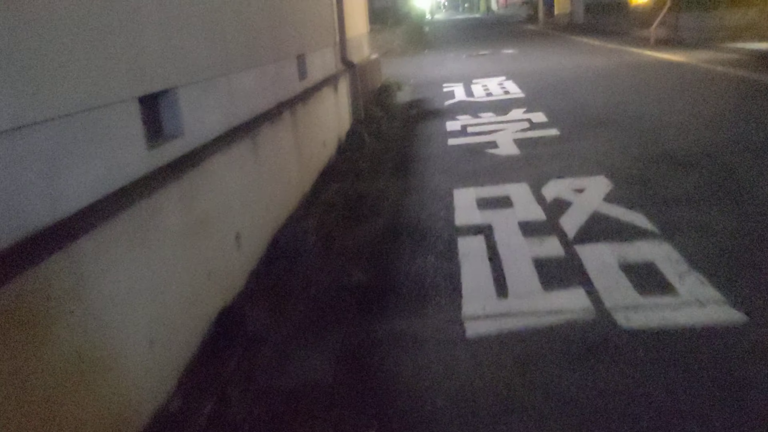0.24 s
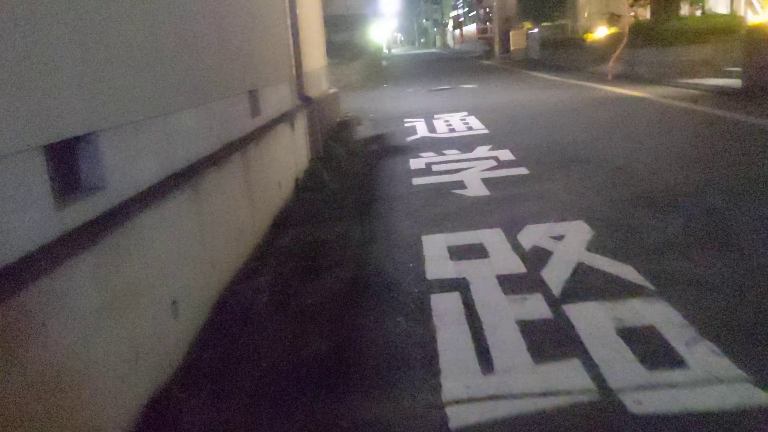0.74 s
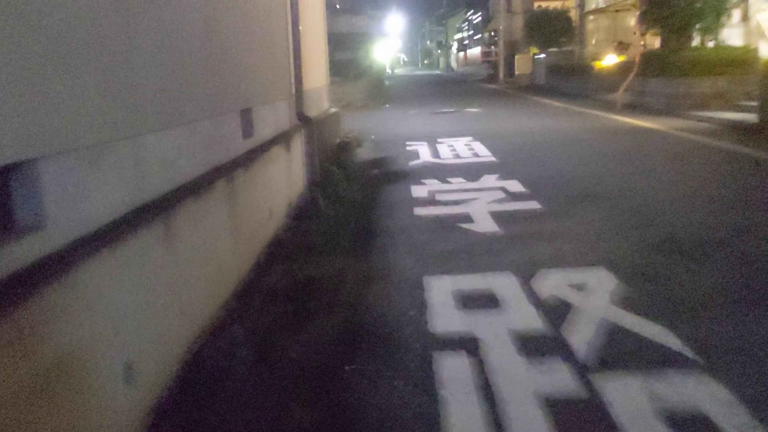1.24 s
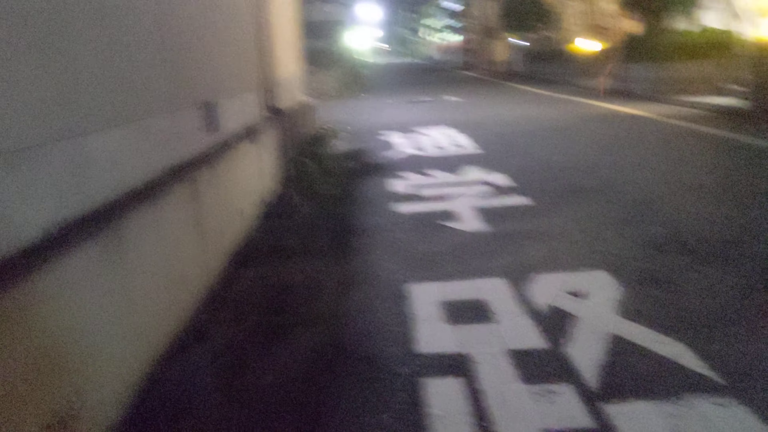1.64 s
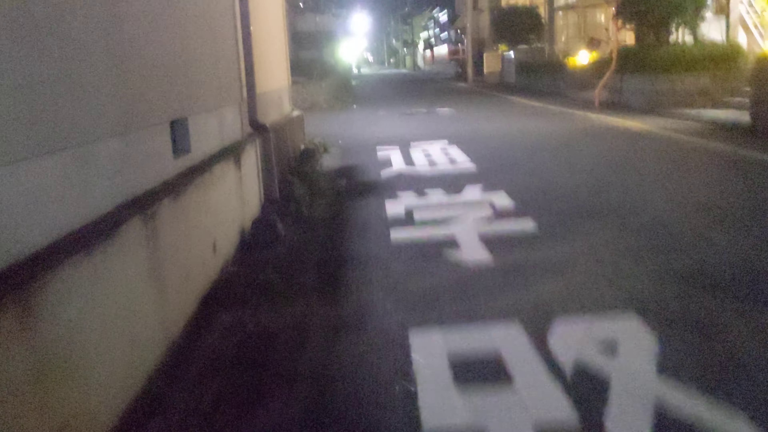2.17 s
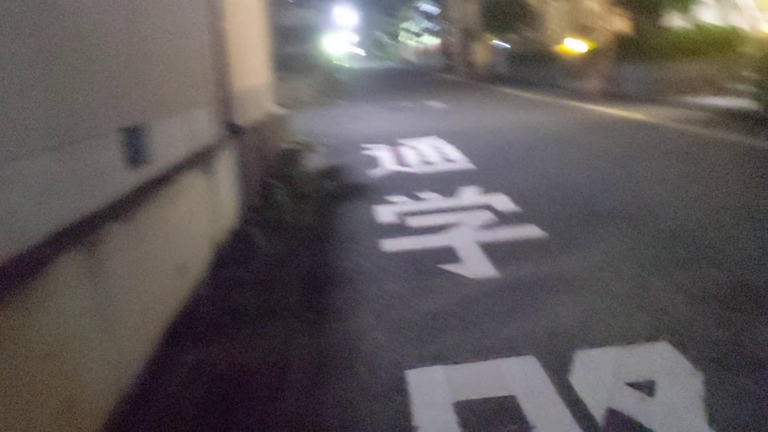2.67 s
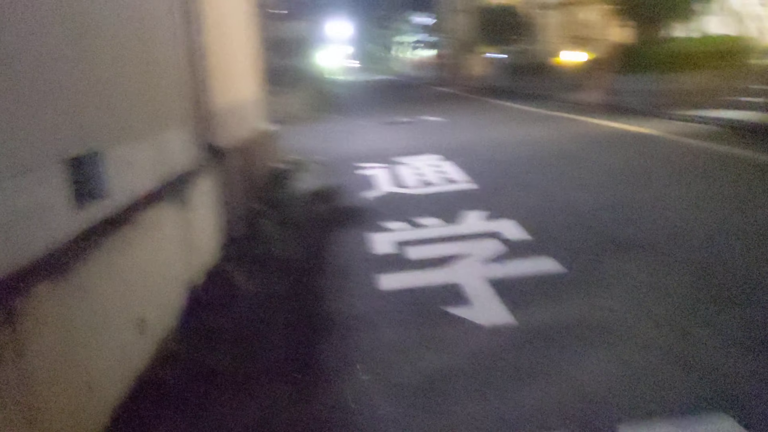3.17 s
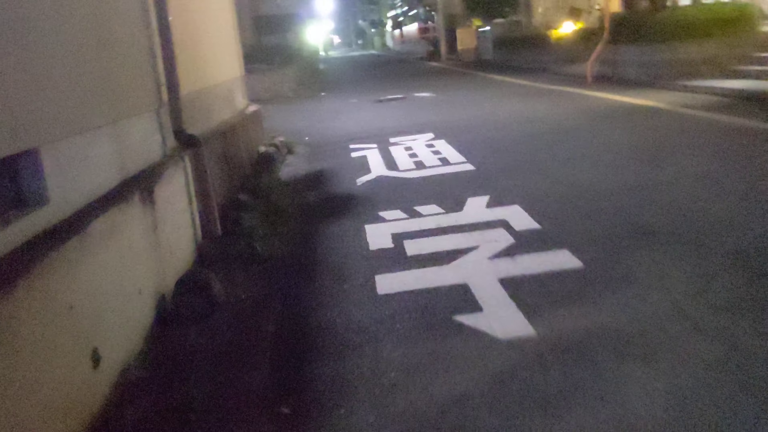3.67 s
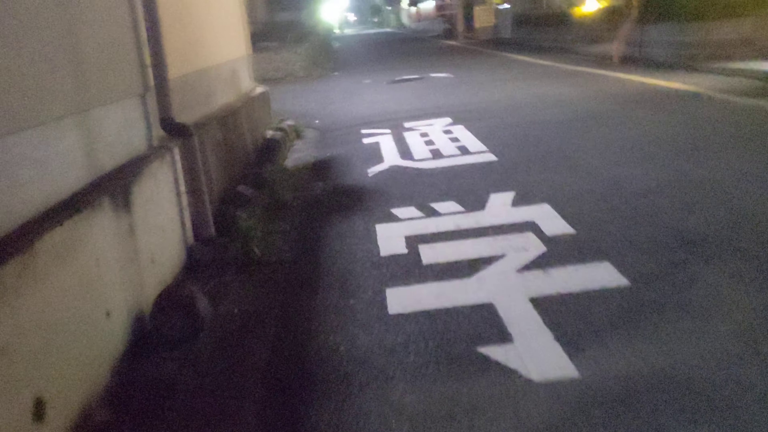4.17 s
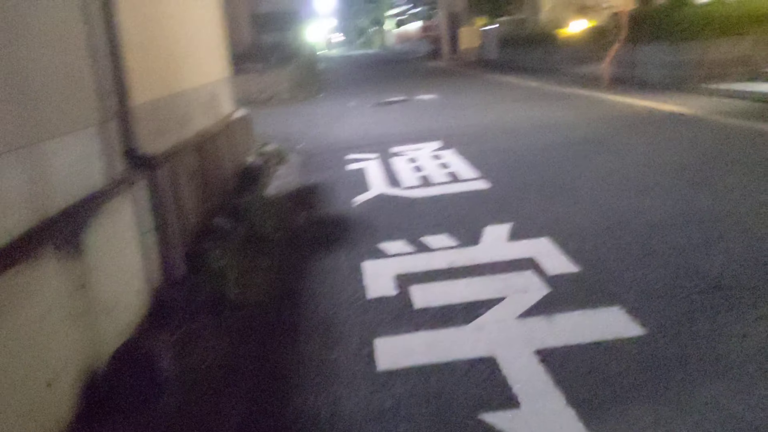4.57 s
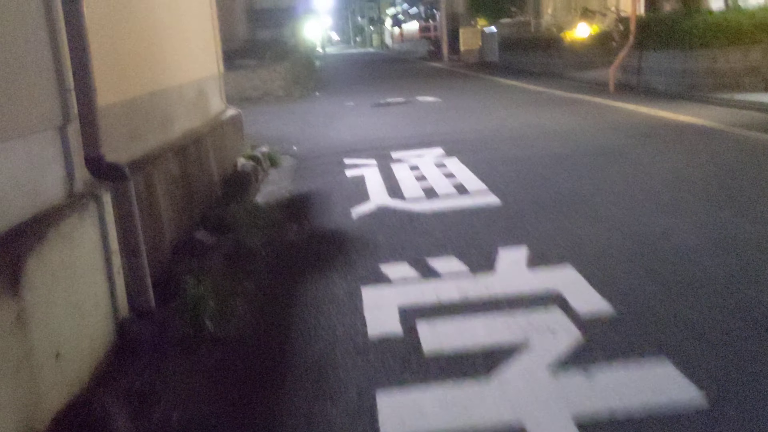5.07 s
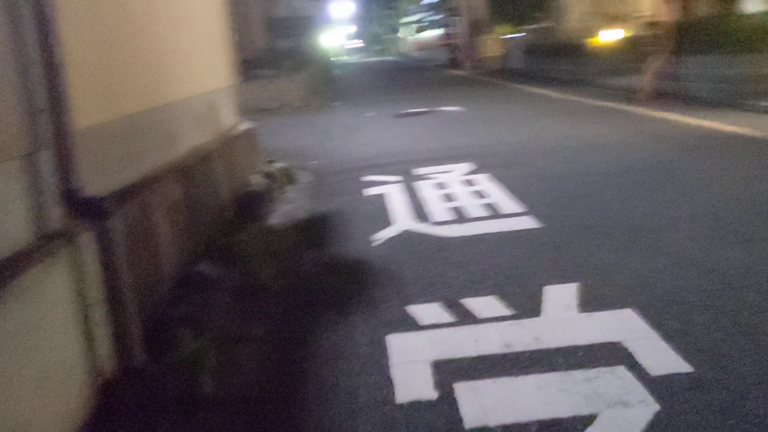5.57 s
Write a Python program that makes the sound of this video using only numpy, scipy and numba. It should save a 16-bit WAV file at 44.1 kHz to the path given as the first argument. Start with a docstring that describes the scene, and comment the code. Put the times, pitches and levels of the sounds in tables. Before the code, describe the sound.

Twelve even footsteps crunch on gritty asphalt at night, heel knocks and rolling scuffs close by, over faint town hiss and low hum.

```python
"""Asphalt street at night: someone walks along it holding a small stereo recorder.
Each step is a heel knock of filtered contact noise, then random grains crunching and slipping under the
rolling sole. The grip thumps the case as short rocking pulses, noise puffs tick faintly in the treble,
and narrow-noise hum lies under the band-filtered hiss of the town."""
import sys
import numpy as np
from scipy import signal
from scipy.io import wavfile
from numba import njit

SR = 44100
rng = np.random.default_rng(int(sys.argv[2]) if len(sys.argv) > 2 else 0)


def store_wav(level_fs):
    """Save 16-bit WAV to argv[1]."""
    pcm = np.round(np.clip(np.atleast_2d(level_fs), -1, 1) * 32767)
    wavfile.write(sys.argv[1], SR, pcm.T.astype(np.int16))


N = 256220

# Heels landing. Each row: start in seconds, level in dB, sole ring in Hz, low knock, mid and treble
# in dB re that level, body thud in dB on its own, time to peak load in seconds.
HEELS = [(0.075, -14, 1370, -40, -21, -18, -34.5, 0.0028), (0.66, -9.5, 1750, -1.5, -5, -18.5, -41, 0.0032),
         (1.057, -20, 1530, -1.5, -7.5, -14, -39, 0.0032), (1.668, -15.5, 650, 0.5, -5.5, -19, -33, 0.0029),
         (2.052, -20, 1340, -9.5, -10, -9, -37.5, 0.0028), (2.646, -11, 995, -1, -15, -22, -32.5, 0.0025),
         (3.063, -12, 1310, -5, -10, -16, -31, 0.0033), (3.593, -10, 565, 1, -23, -20, -33, 0.0025),
         (3.975, -17.5, 1160, -3, -11.5, -14, -30, 0.0052), (4.55, -8.5, 990, -4, -8.5, -20, -40, 0.004),
         (4.981, -19.5, 1070, -4, -8, -19, -34, 0.0021), (5.553, -19, 955, 4, -4, -20, -30, 0.0027)]


def from_db(db):
    """Gain of a level in dB."""
    return 10 ** (np.asarray(db) / 20)


def rms_one(x):
    """Scaled to rms 1."""
    return x / np.sqrt(np.mean(x ** 2) + 1e-20)


def peak_one(x):
    """Scaled so that the first row peaks at 1."""
    return x / np.max(np.abs(x[0]))


def at_hz(points, hz):
    """Value of a (Hz, value) table, linear on a log-frequency axis."""
    points_hz, values = np.array(points).T
    return np.interp(np.log(hz), np.log(points_hz), values)


def drift(rate_hz):
    """Slow random signal of rms 1: noise through two equal poles, drawn at every 20th sample."""
    r = np.exp(-40 * np.pi * rate_hz / SR)
    noise = rng.standard_normal(N // 20 + 2002)
    slow = signal.lfilter([1], [1, -2 * r, r * r], noise)[2000:]   # settled part
    return np.interp(np.arange(N) / 20, np.arange(len(slow)), rms_one(slow))


def resonate(x, hz, width_hz):
    """One two-pole resonance, gain 1 on top."""
    r = np.exp(-np.pi * width_hz / SR)
    zeros = [(1 - r * r) / 2, 0, (r * r - 1) / 2]
    poles = [1, -2 * r * np.cos(2 * np.pi * hz / SR), r * r]
    return signal.lfilter(zeros, poles, x)


def resonate_twice(x, hz, width_hz):
    """The same resonance two times over, for steep skirts."""
    return resonate(resonate(x, hz, width_hz), hz, width_hz)


@njit
def moving_resonance(x, cosine, r):
    """A two-pole resonance whose centre changes sample by sample."""
    y = np.zeros_like(x)
    for c in range(x.shape[0]):
        for i in range(2, x.shape[1]):
            drive = (1 - r * r) / 2 * (x[c, i] - x[c, i - 2])
            y[c, i] = drive + 2 * r * cosine[i] * y[c, i - 1] - r * r * y[c, i - 2]
    return y


def spread(mid, side, alike, pan_db=0):
    """Left and right from a shared and an opposed part; alike is their likeness, -1 to 1."""
    alike = np.clip(alike, -1, 1)
    pair = np.sqrt(1 + alike) * mid + np.sqrt(1 - alike) * side * [[1], [-1]]
    return pair * from_db(np.multiply.outer([.5, -.5], np.atleast_1d(pan_db)))


def bands():
    """Half-octave filters with their centres in Hz."""
    edges_hz = 28 * 2 ** np.arange(0, 9.6, .5)
    return [(np.sqrt(a * b), signal.butter(2, [a, b], "band", fs=SR, output="sos"))
            for a, b in zip(edges_hz, edges_hz[1:])]


def burst(t60_s, rise_s):
    """Two noises under a quick rise and an exponential decay, cut at 1/8 s."""
    t = np.arange(SR // 8) / SR
    envelope = (1 - np.exp(-(t / rise_s) ** 2)) * from_db(-60 * t / t60_s)
    return rng.standard_normal((2, len(t))) * envelope


def add(out, start_s, sound):
    """Mix a short sound in at a time."""
    i = round(start_s * SR)
    out[:, i:i + sound.shape[1]] += sound[:, :N - i]


def town():
    """Distant hiss: noise in half-octave bands with slow level patches; the hum is narrow noise."""
    # Hiss spectrum. Each row: Hz, relative level in dB per Hz.
    hiss_colour = [(15, -35), (25, 2), (59, 3.5), (127, 3), (439, -14), (1290, -19.5), (1560, -17.5),
                   (2760, -25), (3430, -22.5), (7110, -32), (10700, -30), (14400, -44), (16000, -42)]
    # Stereo of the hiss. Each row: Hz, left-right likeness.
    likeness = [(60, -0.14), (180, 0.38), (550, 0.62), (1650, 0.073), (4970, -0.053), (15000, 0.13)]
    # Wavering low hum. Each row: Hz, width of each resonance pass in Hz, level in dB.
    hums = [(55.6, 17, -61.5), (119.6, 12, -69.5)]
    hiss_db, patch_db, patch_rate_hz = -54.5, 3.0, 4.9
    white, hiss = rng.standard_normal((2, 2, N)), 0
    for k, (hz, sos) in enumerate(bands()):
        gain = from_db(at_hz(hiss_colour, hz) + patch_db * drift(patch_rate_hz))
        band = signal.sosfilt(sos, white[k % 2])   # neighbouring bands use separate noises
        hiss = hiss + gain * spread(*band, at_hz(likeness, hz))
    out = from_db(hiss_db) * rms_one(hiss)
    for hz, width_hz, level_db in hums:
        narrow = resonate_twice(rng.standard_normal((2, N)), hz, width_hz)
        out = out + from_db(level_db) * spread(*rms_one(narrow), 0.94)
    return out


def ticks():
    """Treble ticks are short noise puffs through resonances; a small metal part rings as a decaying sine."""
    # Faint ticks. Each row: start in seconds, level in dB.
    puffs = [(0.307, -42.5), (0.355, -43.5), (0.4086, -45), (0.52, -47), (0.9, -47), (1.0253, -45.5),
             (1.3612, -42), (1.465, -45), (1.5824, -42), (1.766, -42), (1.828, -43), (1.944, -47),
             (2.2693, -42.5), (2.288, -47), (2.368, -43), (2.471, -44), (2.588, -42), (2.9364, -46),
             (3.045, -47), (3.2525, -44.5), (3.3555, -42.5), (3.4608, -43.5), (3.6925, -48), (3.91, -41.5),
             (4.2364, -44.5), (4.3436, -42), (4.463, -31), (4.72, -47), (4.842, -43), (4.9566, -43.5),
             (5.27, -44), (5.372, -44.5), (5.4853, -43.5), (5.723, -44)]
    # Resonances of a tick. Each row: Hz, width in Hz, level in dB.
    modes = [(2560, 790, 1.5), (7050, 4400, 1.5), (9600, 500, -16), (14000, 12000, -15.5)]
    # Metal pings. Each row: start in seconds, level in dB, Hz, t60 in seconds.
    pings = [(3.776, -50, 5930, 0.16), (5.748, -63, 5900, 0.14)]
    out = np.zeros((2, N))
    for start_s, level_db in puffs:
        puff = burst(t60_s=0.046, rise_s=0.00045)
        tick = sum(from_db(db) * resonate(puff, hz, width_hz) for hz, width_hz, db in modes)
        add(out, start_s, from_db(level_db) * peak_one(tick))
    t = np.arange(SR // 4) / SR
    for start_s, level_db, hz, t60_s in pings:
        envelope = from_db(level_db - 60 * t / t60_s) * np.minimum(t / 0.0027, 1)
        add(out, start_s, envelope * np.sin(2 * np.pi * hz * t) * [[1], [1]])
    return out


def thumps():
    """The hand shifts on the case: a push rocks it for a cycle or two, the rubbing grip leaves a rumble."""
    # Pushes, opposed at the two ports. Each row: centre in seconds, level in dB, rocking in Hz,
    # envelope spread in seconds, left-right balance in dB.
    pushes = [(0.382, -40, 80, 0.0074, 0), (0.508, -46, 50, 0.013, 1), (0.868, -28, 183, 0.0044, -2.5),
              (0.879, -23.5, 108, 0.0088, -4.5), (0.973, -31, 85, 0.01, 5.5),
              (1.331, -26.5, 90, 0.0089, -7.5), (1.38, -34, 69.6, 0.0062, -1),
              (1.856, -24.5, 81, 0.0057, 5), (2.101, -29, 80, 0.0037, -3), (2.671, -35, 109, 0.01, 19),
              (2.686, -24.5, 110, 0.0054, 7.5), (2.779, -22, 61.8, 0.0054, 7), (3.11, -33, 81, 0.01, -2),
              (3.355, -36, 80, 0.0096, 1), (3.755, -22, 62.5, 0.013, -3)]
    rumble_db, rumble_hz, rumble_width_hz = -16, 90, 94   # level re push
    out, t = np.zeros((2, N)), np.arange(-SR // 20, SR // 10) / SR
    for centre_s, level_db, hz, spread_s, pan_db in pushes:
        before, after = np.exp(-(1.34 * t / spread_s) ** 2), 1 / np.cosh(2.1 * t / spread_s)
        rock = -np.where(t < 0, before, after) * np.cos(2 * np.pi * hz * t)
        add(out, centre_s + t[0], from_db(level_db) * spread(rock, rock, -1, pan_db) / np.sqrt(2))
        rubbing = burst(t60_s=0.26, rise_s=0.0054)
        rumble = peak_one(resonate_twice(rubbing, rumble_hz, rumble_width_hz))
        add(out, centre_s, from_db(level_db + rumble_db) * spread(*rumble, -0.15, pan_db))
    return out


def last_heel():
    """Index of the latest heel at every sample; the first heel's before it lands."""
    return np.maximum(np.searchsorted(np.array(HEELS)[:, 0], np.arange(N) / SR) - 1, 0)


def blows():
    """Heels and cracks as one list; all cracks share their low, treble, thud and contact settings."""
    # Single stones cracking under the sole. Each row: start in seconds, level in dB, ring in Hz,
    # mid in dB re level.
    cracks = [(0.092, -29, 820, -19), (0.122, -29.5, 1350, -23), (0.141, -25, 800, -27),
              (0.165, -21.5, 1220, -27), (0.196, -33, 828, -21), (0.225, -36, 784, -30),
              (0.454, -42.5, 1020, -5), (0.684, -15.5, 961, -0.5), (0.698, -17, 1020, 4.5),
              (0.705, -18, 830, 2.5), (0.778, -38, 497, -7), (1.085, -16.5, 900, -18),
              (1.113, -40, 563, -10), (1.148, -31, 1380, -8), (1.18, -33, 856, -16), (1.215, -37, 930, -9),
              (1.278, -38.5, 880, -2), (1.362, -45.5, 1000, -2), (1.452, -45, 1200, -6),
              (1.687, -19, 1140, -11), (1.713, -12, 910, -1), (2.094, -25, 888, -2.5),
              (2.115, -26, 1390, -10), (2.147, -25.5, 960, -16), (2.205, -40, 826, -13),
              (2.352, -43.5, 1230, 4), (2.665, -31, 1310, 8), (2.773, -28.5, 670, -14),
              (2.8, -43, 900, -1.5), (2.861, -36, 970, -8.5), (3.111, -21.5, 570, -14),
              (3.196, -19.5, 890, -9), (3.32, -31, 1150, -0.5), (3.385, -46, 1200, -6),
              (3.442, -45, 1200, -11), (3.768, -39, 900, -5), (3.406, -37, 960, -20),
              (3.476, -36, 1280, -3.5), (3.802, -43, 1380, -2), (4.01, -36, 581, -14),
              (4.049, -27.5, 894, -7), (4.086, -25.5, 1140, -3), (4.11, -34.5, 870, 3.5),
              (4.127, -31, 990, -2), (4.382, -44, 1010, 1.5), (4.447, -33, 950, -14),
              (4.493, -38, 1010, -17), (4.572, -16.5, 1360, -3.5), (4.632, -23, 970, 1),
              (4.78, -37.5, 820, -7.5), (4.995, -23.5, 1200, -27), (5.019, -24, 845, -11),
              (5.033, -26, 1170, -24), (5.051, -26.5, 1120, -21), (5.125, -38, 1070, -1),
              (5.245, -40.5, 714, -9), (5.336, -43.5, 1250, -7), (5.593, -20, 1260, 3.5)]
    low_db, treble_re_mid_db, thud_re_level_db, press_s = -12.5, -8, -25.5, 0.0029
    return HEELS + [(start_s, level_db, hz, low_db, mid_db, mid_db + treble_re_mid_db,
                     level_db + thud_re_level_db, press_s)
                    for start_s, level_db, hz, mid_db in cracks]


def sole_load():
    """Level, ring pitch, mid and treble of the grit in time; the loudest contact rules."""
    # Faint rustle after each heel, one row per heel. Each row: level in dB, fade in dB/s.
    linger = [(-33, 49), (-30, 60), (-33.5, 51), (-28, 64.5), (-29, 54), (-32, 66), (-33.5, 35), (-31, 65),
              (-30, 56.5), (-31, 65), (-34, 55), (-34, 53)]
    # Sole rolling or scuffing over grit. Each row: touch, rise and hold in seconds, level at touch,
    # full and lift in dB, sole ring in Hz, mid and treble in dB.
    rolls = [(0.0, 0.004, 0.062, -36, -38, -46.5, 1250, -7, 20.5),
             (0.093, 0.073, 0.097, -29, -29.5, -33.5, 950, -9, -1.5),
             (0.667, 0.023, 0.031, -15, -9.5, -14.5, 824, -1, 3.5),
             (1.074, 0.011, 0.036, -14.5, -13.5, -28.5, 865, -4, -4),
             (1.169, 0.048, 0.046, -37.5, -29, -39, 890, -1.5, -2),
             (1.687, 0.039, 0.012, -19, -6, -15.5, 920, -2.5, -3.5),
             (2.052, 0.038, 0.028, -28, -30, -24, 950, 3.5, 1),
             (2.142, 0.04, 0.075, -27.5, -29, -36.5, 830, -3.5, -2),
             (2.662, 0.007, 0.053, -29, -28.5, -30.5, 1030, 1.5, 15.5),
             (3.057, 0.055, 0.094, -28.5, -22.5, -20, 615, 1.5, -3),
             (3.608, 0.025, 0.026, -23, -15.5, -25, 1090, -8, 5.5),
             (3.99, 0.0075, 0.019, -27, -22, -27.5, 640, -7, 0.5),
             (4.033, 0.07, 0.031, -24, -19.5, -28, 885, -6.5, -3),
             (4.454, 0.016, 0.048, -31, -35.5, -43, 900, -1.5, 0.5),
             (4.552, 0.015, 0.08, -19, -13.5, -28.5, 940, -5.5, 1),
             (4.998, 0.005, 0.038, -24, -30.5, -30, 1050, -3.5, 0.5),
             (5.045, 0.0057, 0.091, -30, -25, -26.5, 880, -10, -3.5),
             (5.568, 0.039, 0.017, -17.5, -13, -22, 1056, -4.5, 3)]
    stride_s, lift_db_per_s = 0.5, 944   # the grit falls away when the sole lifts
    linger_hz, linger_mid_db, linger_treble_db, dulling_db_per_s = 806, -1, 2.5, 12
    t, last = np.arange(N) / SR, last_heel()
    since_s = t - np.array(HEELS)[last, 0]
    since_s = np.where(since_s < 0, since_s + stride_s, since_s)   # the step before the first is a stride back
    start_db, fade_db_per_s = np.array(linger)[last].T
    rustle_db = start_db - fade_db_per_s * since_s + 0.5 * drift(15)
    dulling_db = dulling_db_per_s * since_s
    controls = np.array([rustle_db, linger_hz + 0 * t, linger_mid_db - dulling_db, linger_treble_db - dulling_db])
    for touch_s, rise_s, hold_s, touch_db, full_db, lift_db, *colour in rolls:
        lift_s = touch_s + rise_s + hold_s
        level_db = np.interp(t, [touch_s, touch_s + rise_s, lift_s], [touch_db, full_db, lift_db])
        level_db -= lift_db_per_s * np.maximum(t - lift_s, 0)
        on = (t >= touch_s) & (level_db > controls[0])
        controls[0, on] = level_db[on]
        controls[1:, on] = np.array(colour)[:, None]
    return controls


def grit():
    """Dense uneven grains in clumps ring the bending sole; the load sets level and brightness."""
    # Grit spectrum. Each row: Hz, relative level in dB per Hz.
    grit_colour = [(59, -28), (100, -15.5), (239, -10), (398, -5), (547, -6.5), (910, -16.5), (991, -6.5),
                   (1550, -14.5), (1910, -4), (2690, -20.5), (4570, -14.5), (6990, -23), (10700, -24),
                   (11900, -26.5), (16000, -26)]
    # Stereo of the steps. Each row: Hz, left-right likeness.
    likeness = [(150, 0.58), (500, 0.95), (1000, 0.48), (2000, 0.24), (4000, 0.08), (12000, 0.044)]
    # The ports favour a side. Each row: Hz, left-right balance in dB.
    balance = [(60, 2), (130, 9), (290, -3), (640, 4.5), (1410, -8), (3100, 2.5), (6820, 5), (15000, 1.5)]
    grains_per_s, grain_spread_db, clump_db, patch_db = 2000, 2.5, 2, 2.5
    sole_width_hz, sole_db = 166, 1.5
    slip_dip_db, slip_s = 5, 0.0098
    t = np.arange(N) / SR
    level_db, sole_hz, mid_db, treble_db = sole_load()
    sizes = from_db(grain_spread_db * np.minimum(rng.exponential(1, (4, N)), 5))
    sizes = sizes * rng.choice([-1, 1], (4, N))
    grains = rms_one(sizes * (rng.random((4, N)) < grains_per_s / SR))
    grains = rms_one(grains + 0.41 * rng.standard_normal((4, N)))
    sole_cosine, sole_r = np.cos(2 * np.pi * sole_hz / SR), np.exp(-np.pi * sole_width_hz / SR)
    ringing = moving_resonance(grains, sole_cosine, sole_r)
    grains = (grains + from_db(sole_db) * ringing).reshape(2, 2, N)
    # stick before slip: the grit falls quiet just ahead of each heel and crack
    sticking = sum(np.exp(-((t - start_s + slip_s) / slip_s * 2) ** 2) for start_s, *_ in blows())
    load_db = level_db + clump_db * drift(65) - slip_dip_db * sticking
    out = 0
    for k, (hz, sos) in enumerate(bands()):
        if hz > 90:
            tilt_db = at_hz([(1100, 0.013), (2200, 0.74), (3300, 0.47), (5500, 0.22)], hz) * mid_db
            tilt_db += at_hz([(3300, 0.0045), (5500, 1.0), (13000, 0.8)], hz) * treble_db
            gain = from_db(load_db + tilt_db + at_hz(grit_colour, hz) + patch_db * drift(29.0))
            band = signal.sosfilt(sos, grains[k % 2] * gain)
            out = out + spread(*band, at_hz(likeness, hz), at_hz(balance, hz))
    return out


def blow_energy(x):
    """Scaled so that each row holds the energy of rms 1 kept up for blow_s."""
    blow_s = 0.00026
    return x / np.sqrt(np.sum(x ** 2, axis=1, keepdims=True) / (SR * blow_s))


def knocks():
    """A few ms of rough contact ring the sole, with a duller knock below, a crack above and a body thud."""
    thud_hz, thud_width_hz, thud_t60_s = 112, 61, 0.077
    out, t = np.zeros((2, N)), np.arange(SR // 20) / SR
    for start_s, level_db, hz, low_db, mid_db, treble_db, thud_db, press_s in blows():
        force = (t / press_s) ** 2 * np.exp(-2 * t / press_s)   # the load peaks after press_s
        contact = force * rng.standard_normal((2, len(t))) + 1e-12
        ring = blow_energy(resonate_twice(contact, hz, 572))
        low = from_db(low_db) * blow_energy(resonate_twice(contact, 331, 355))
        mid = from_db(mid_db) * blow_energy(resonate_twice(contact, 2710, 2750))
        bright = resonate_twice(contact, 6770, 2900) + 0.74 * resonate_twice(contact, 12500, 3400)
        crack = from_db(treble_db) * blow_energy(bright)
        thud = peak_one(resonate(burst(thud_t60_s, rise_s=0.0094), thud_hz, thud_width_hz))
        knock = spread(*ring, 0.5, -3.6) + spread(*low, 0.72)
        knock = knock + spread(*mid, 0.31, -1.2) + spread(*crack, 0.36, 2.1)
        add(out, start_s, from_db(level_db) * knock)
        add(out, start_s, spread(*(from_db(thud_db) * thud), 0.76))
    return out


def walls(x):
    """A few echoes off the house fronts: delayed copies of the mono sum."""
    # Each row: delay in seconds, left and right level in dB.
    echoes = [(.004, -32, -30), (0.012, -25, -21.5), (0.029, -36, -43)]
    out = x.copy()
    for delay_s, left_db, right_db in echoes:
        add(out, delay_s, x.mean(axis=0) * from_db([[left_db], [right_db]]))
    return out


def path(x):
    """The ground echo and the walker's body colour the steps; long waves reach both ports alike."""
    # Path up to the ports. Each row: Hz, width in Hz, share added (or taken, if negative).
    colouring = [(1375, 44, 0.78), (2000, 150, -0.039), (2610, 920, 0.68), (4520, 1600, -0.48)]
    alike_hz, alike_width_hz, alike_share = 500, 840, 0.74
    for hz, width_hz, share in colouring:
        x = x + share * resonate(x, hz, width_hz)
    side = (x[0] - x[1]) / 2
    return x - alike_share * resonate(side, alike_hz, alike_width_hz) * [[1], [-1]]


def feet(x):
    """The feet take turns on either side: the left port hears one late, the other early."""
    # Lag of the left port in seconds, one value per foot.
    foot_lag_s = [0.00005, -0.000011]
    lag_samples = np.array(foot_lag_s)[last_heel() % 2] * SR
    left = np.interp(np.arange(N) - lag_samples, np.arange(N), x[0])
    return np.array([left, x[1]])


def scene():
    """Steps with their echoes, the ticks, the handling and the town."""
    steps = feet(path(walls(knocks() + grit())))
    return steps + ticks() + thumps() + town()


def record(dry):
    """The microphone rolls off the deep bass, its port dips in the treble; the top is cut."""
    notch_hz, notch_width_hz, notch_share = 10620, 440, 0.61
    bass_hz, cutoff_hz = 40, 16500
    dry = dry - notch_share * resonate(dry, notch_hz, notch_width_hz)
    dry = signal.sosfilt(signal.butter(3, bass_hz, "high", fs=SR, output="sos"), dry)
    return signal.sosfilt(signal.cheby2(12, 60, cutoff_hz, fs=SR, output="sos"), dry)


dry = scene()
out = record(dry)
store_wav(out)
```